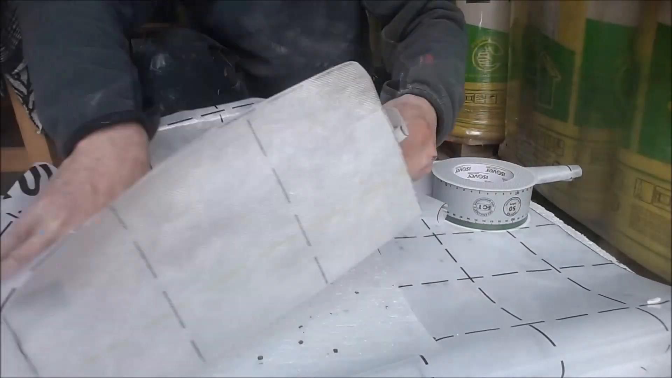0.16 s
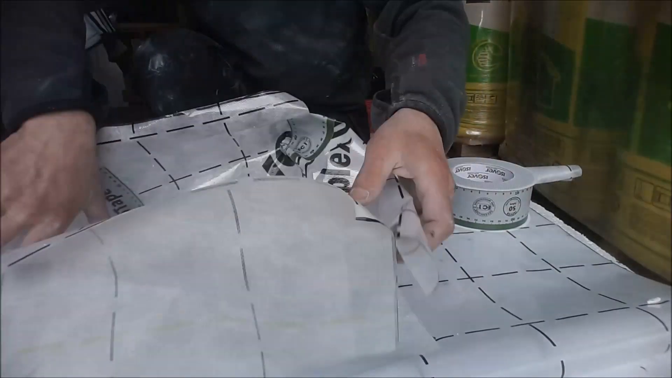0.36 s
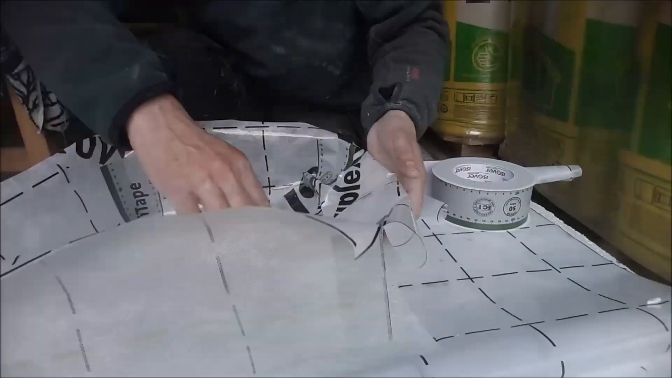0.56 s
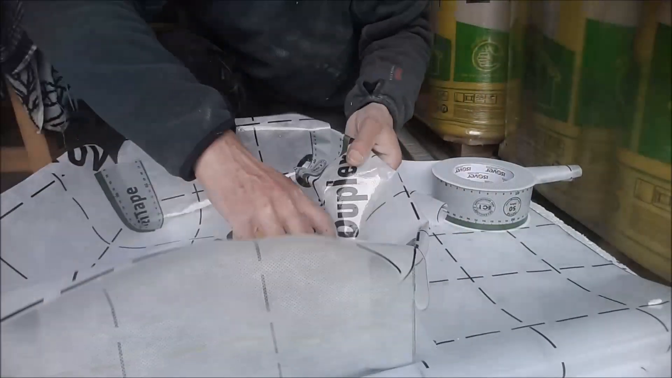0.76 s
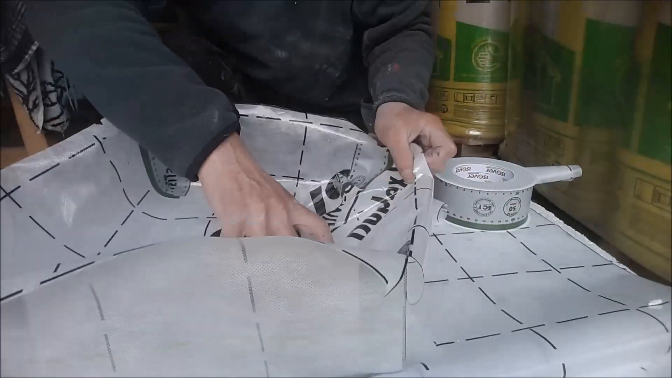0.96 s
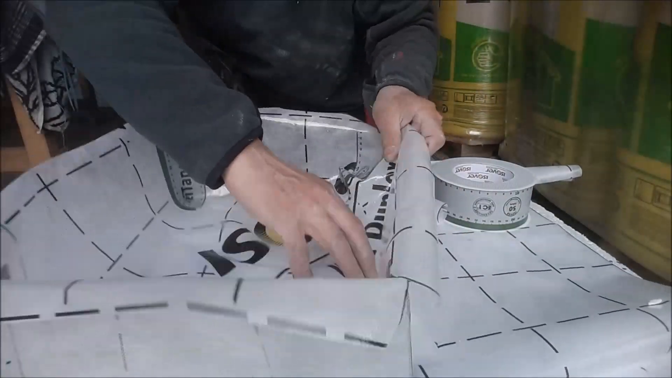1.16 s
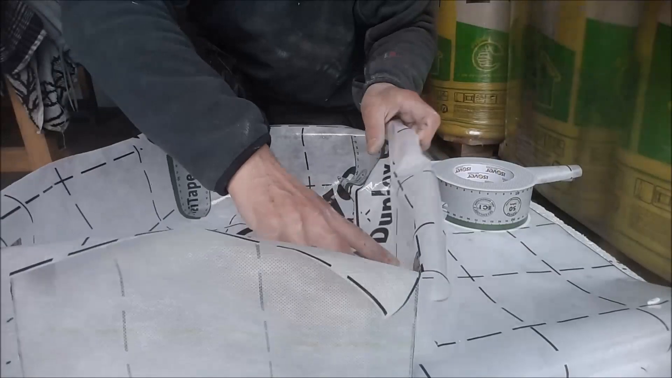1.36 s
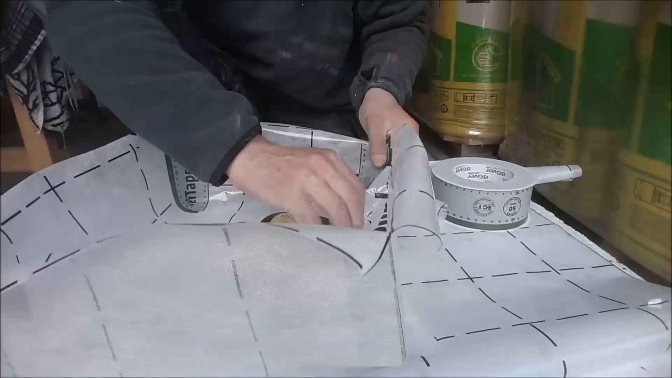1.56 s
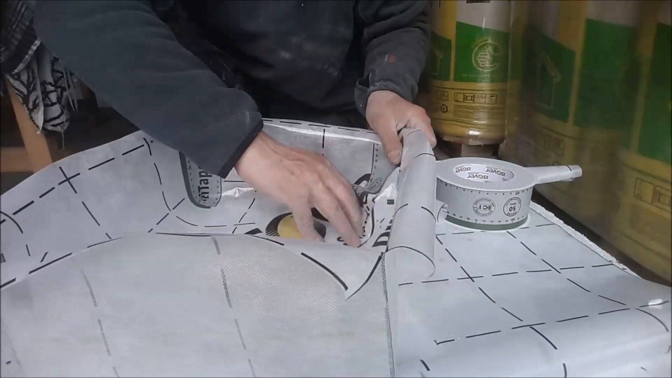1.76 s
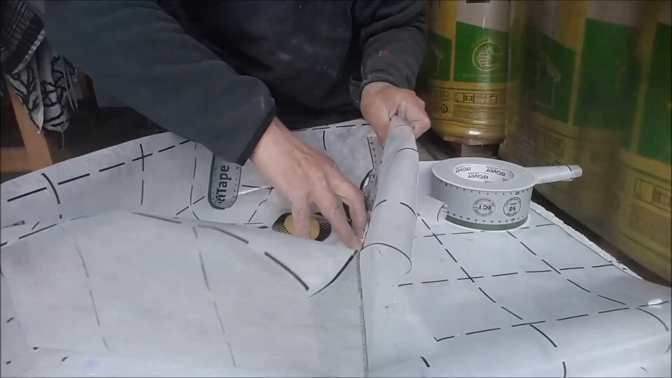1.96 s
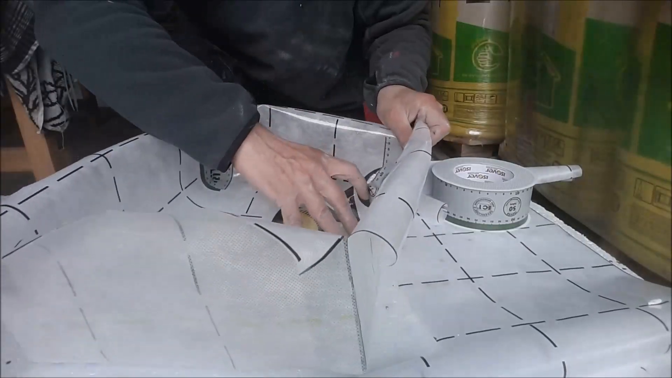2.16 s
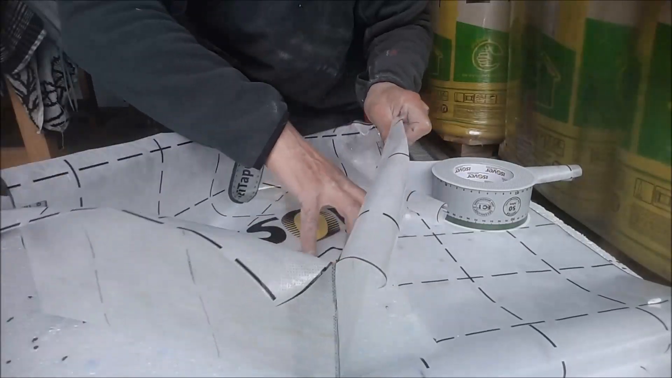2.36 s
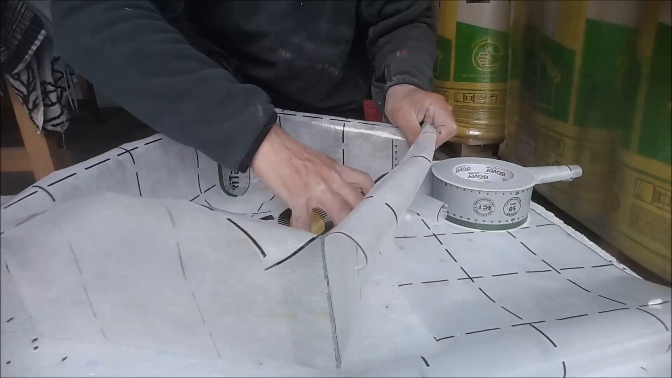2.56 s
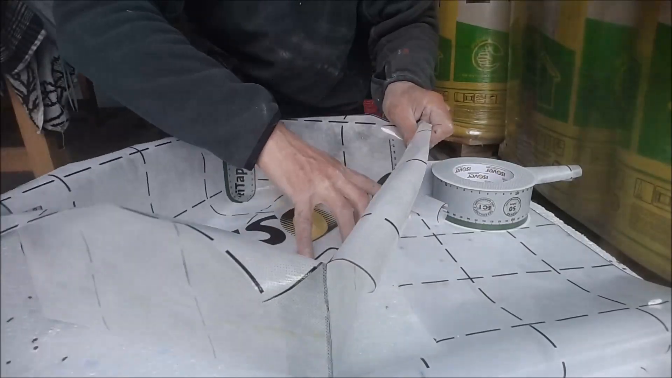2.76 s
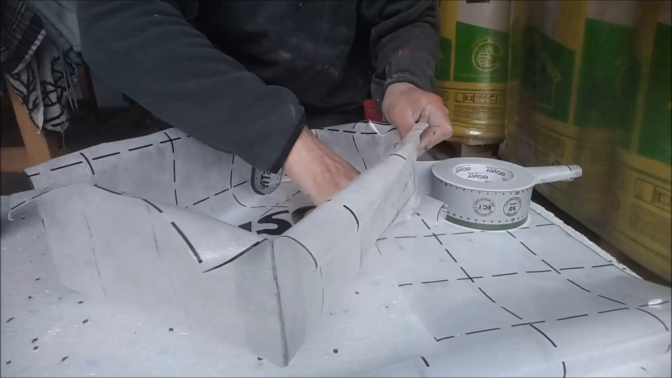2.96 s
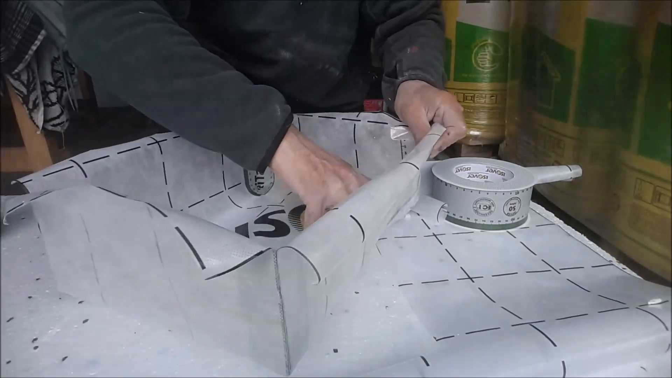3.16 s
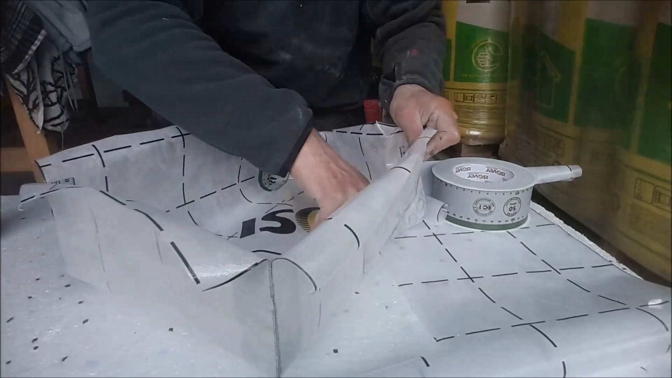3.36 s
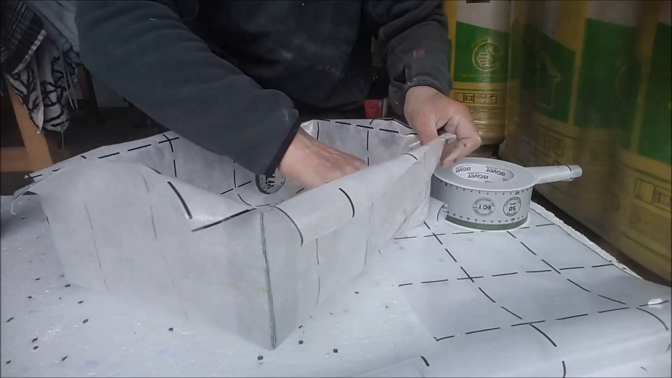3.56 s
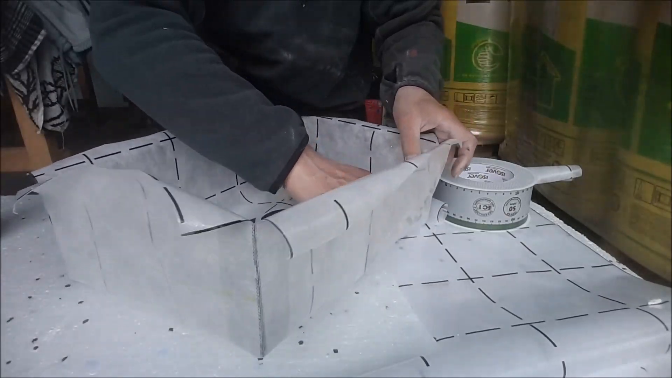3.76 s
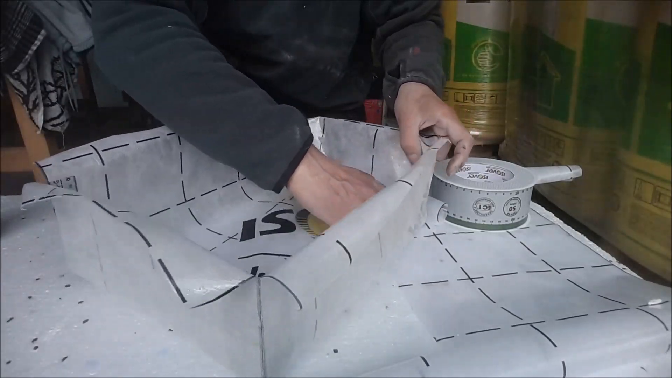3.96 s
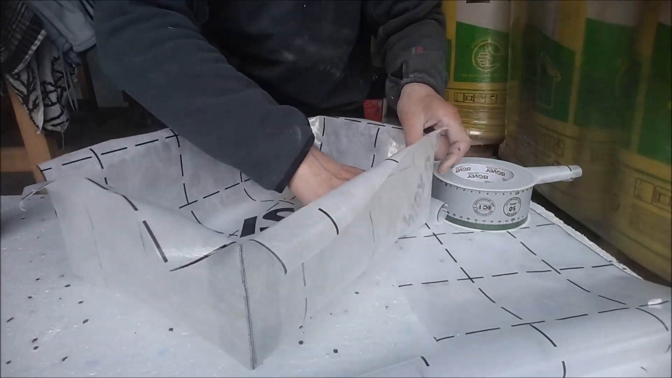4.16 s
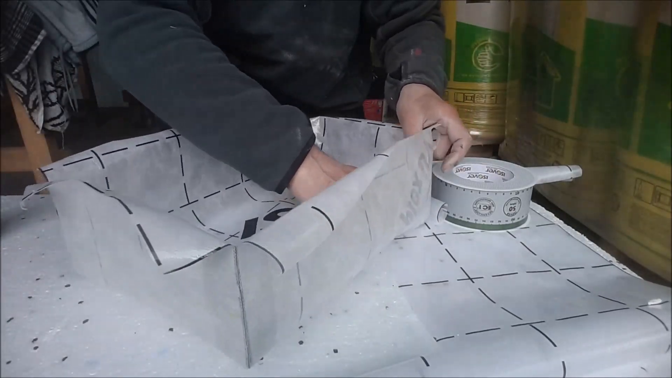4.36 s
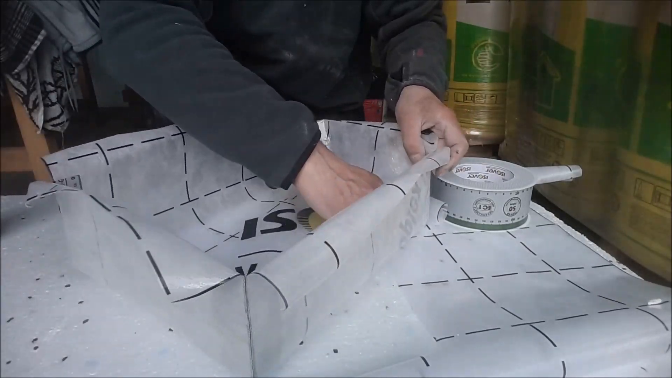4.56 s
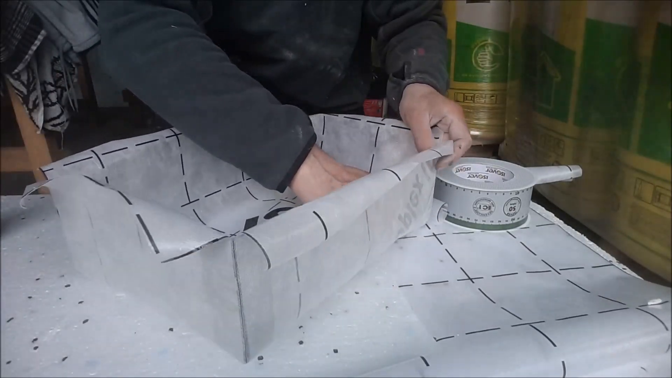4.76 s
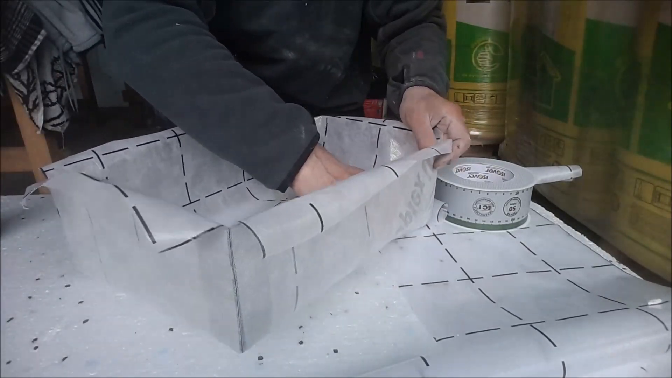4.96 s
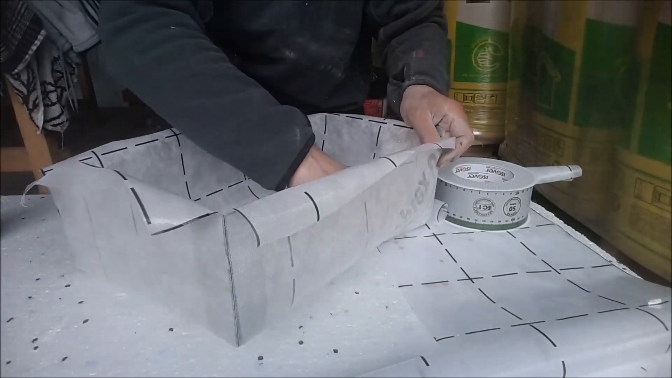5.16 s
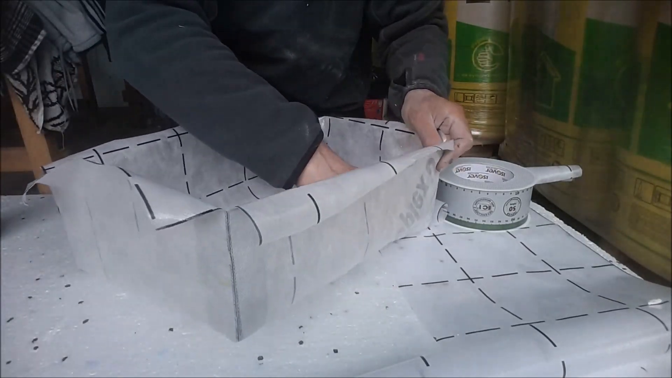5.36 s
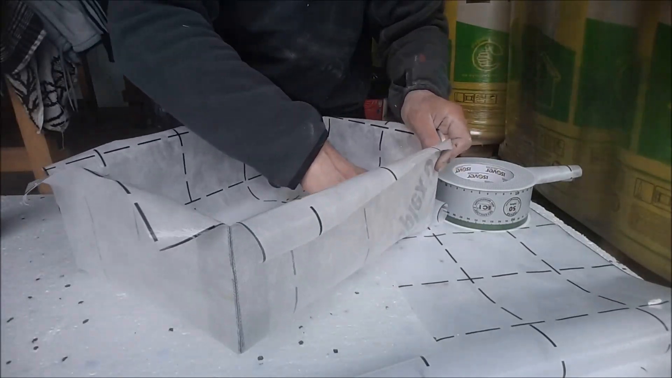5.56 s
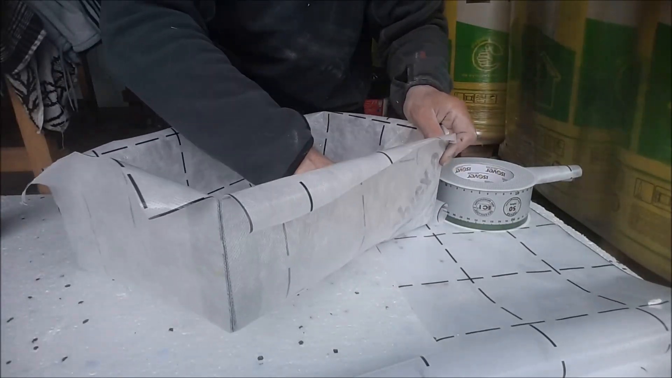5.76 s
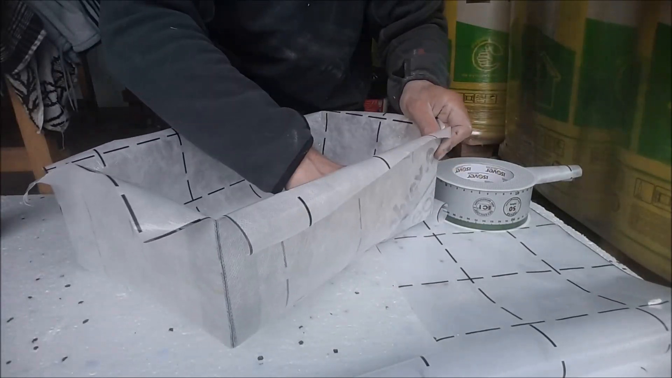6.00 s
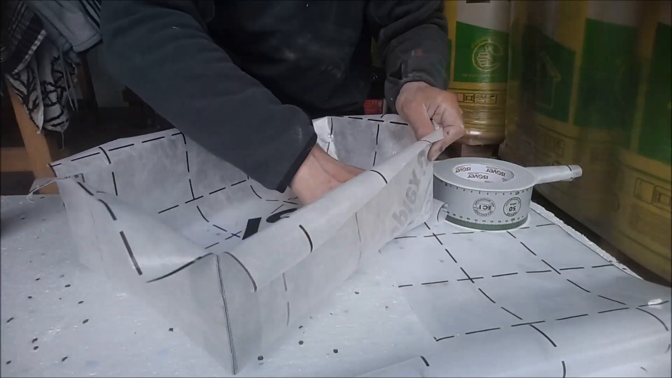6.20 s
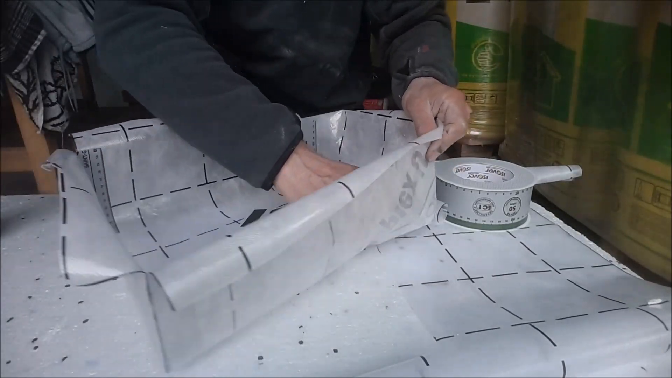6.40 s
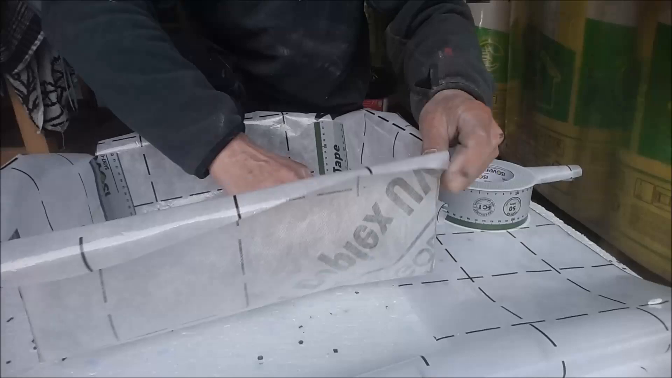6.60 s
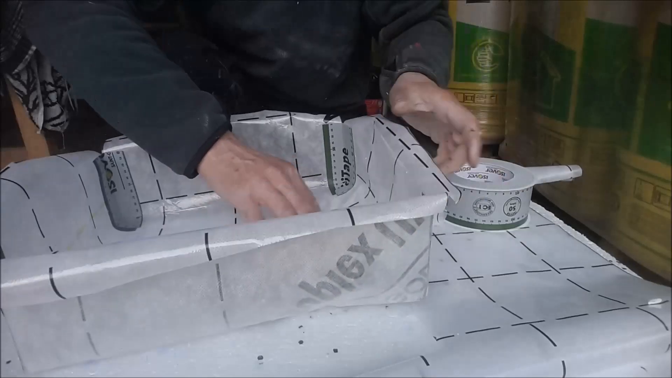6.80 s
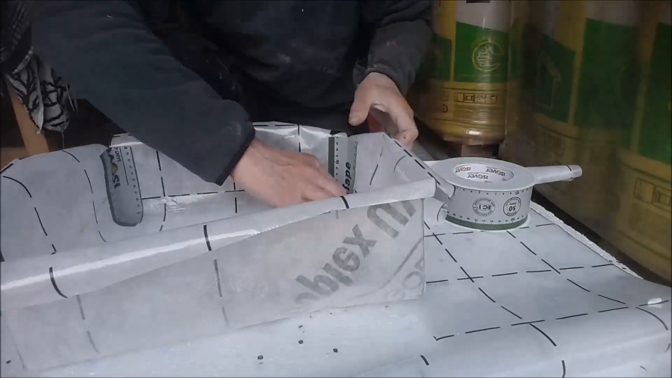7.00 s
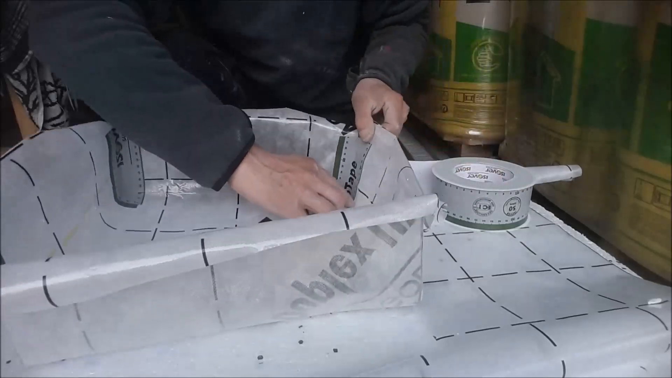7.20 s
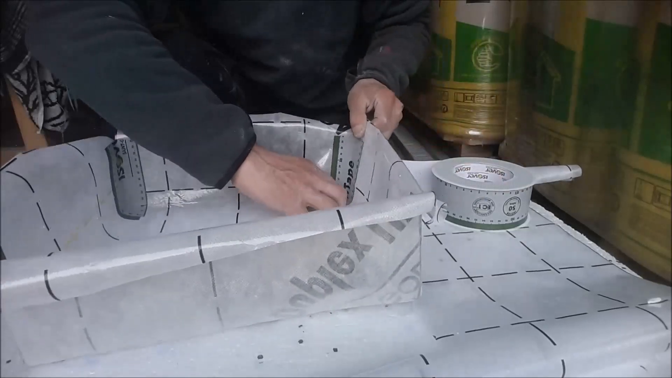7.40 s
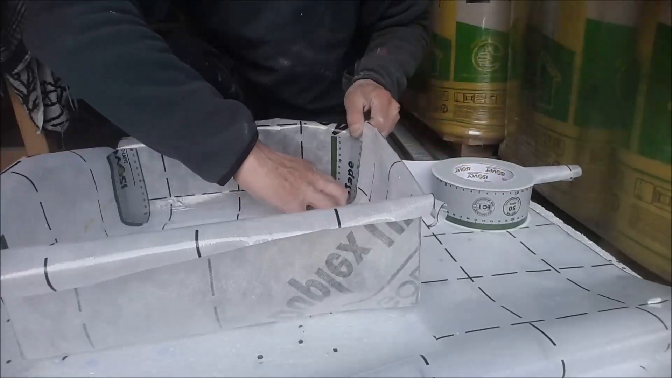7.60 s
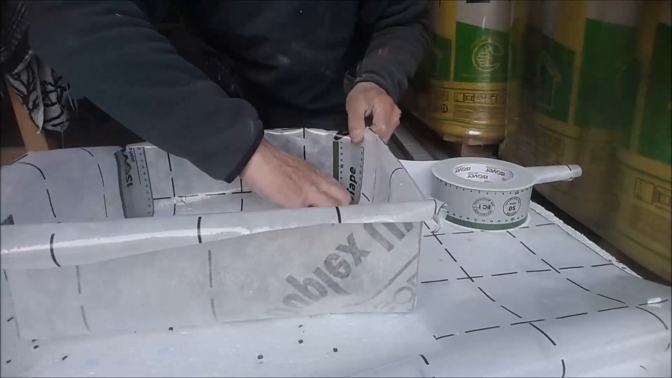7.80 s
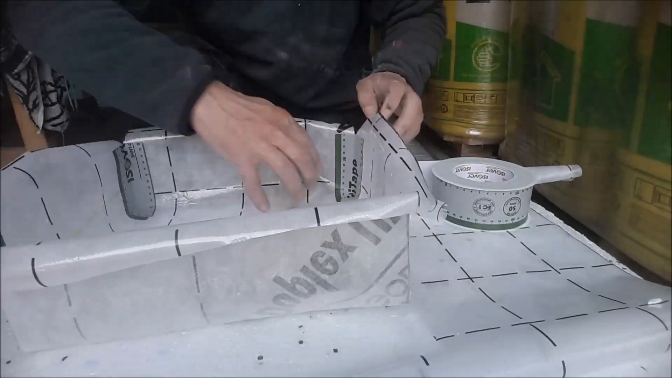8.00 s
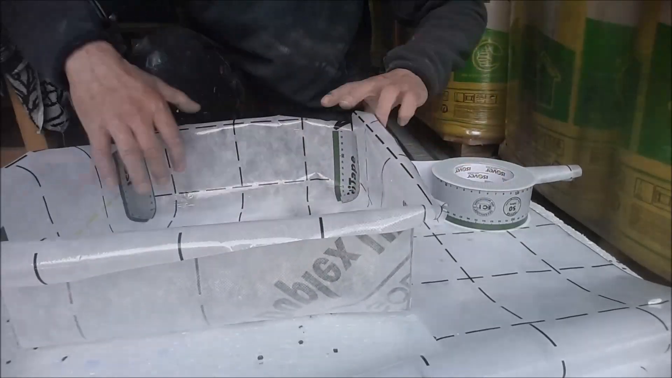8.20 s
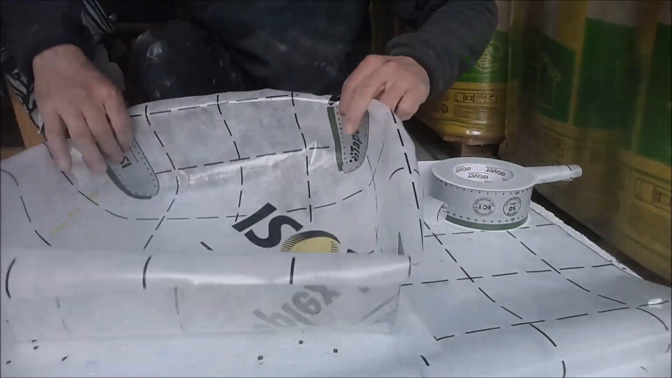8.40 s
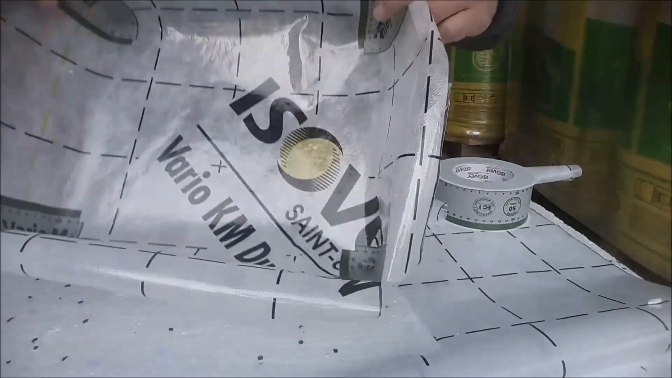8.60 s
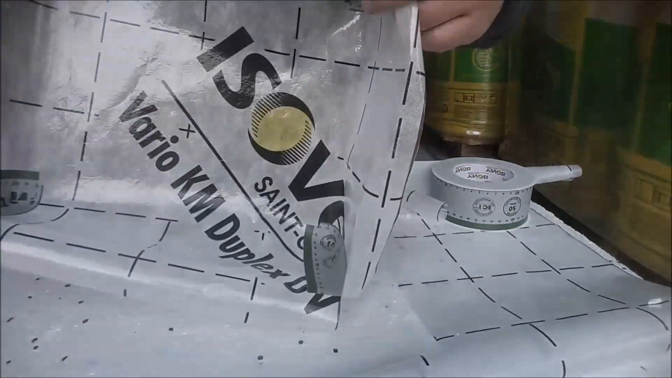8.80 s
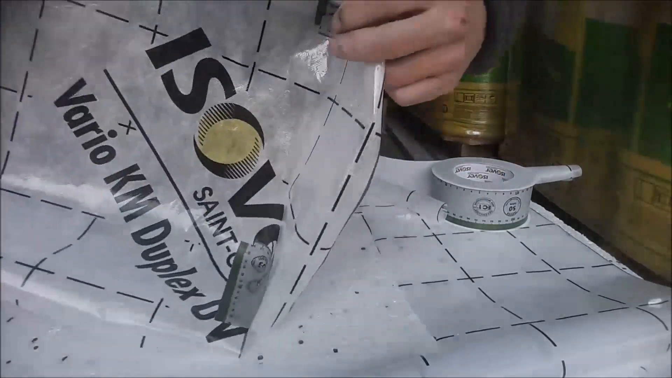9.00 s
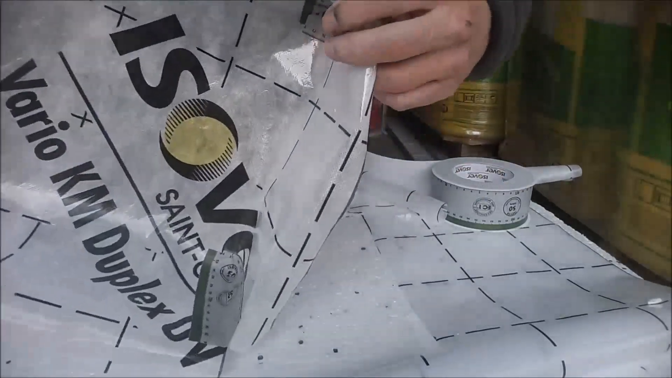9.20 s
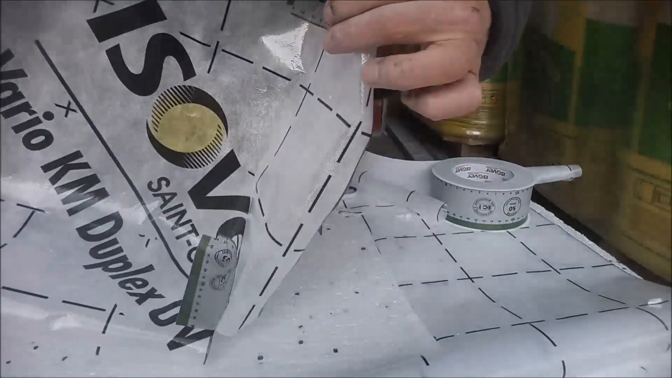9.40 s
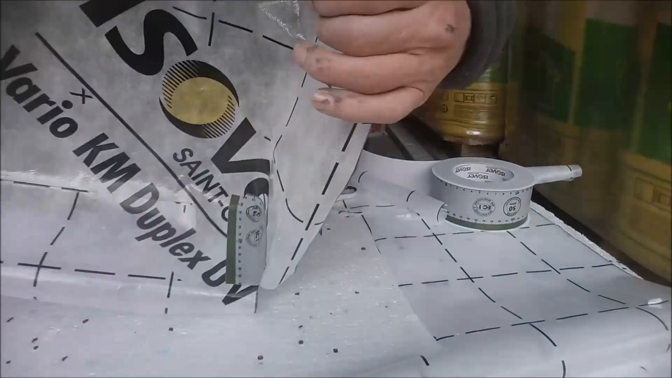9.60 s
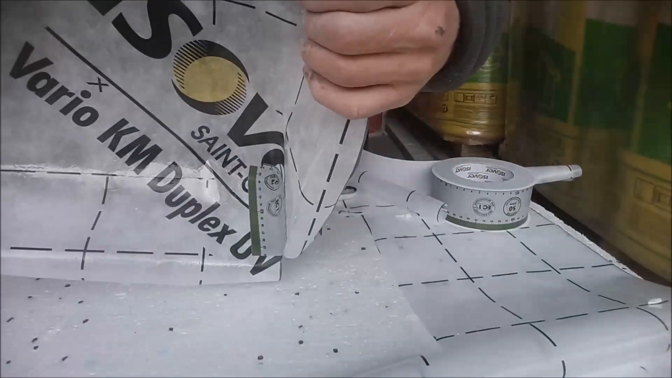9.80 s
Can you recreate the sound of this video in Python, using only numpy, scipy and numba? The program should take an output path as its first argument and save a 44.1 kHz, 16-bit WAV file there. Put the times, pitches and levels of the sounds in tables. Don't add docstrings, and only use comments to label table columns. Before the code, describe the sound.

Hands turn and crease a stiff plastic sheet on a workbench, loud crackling snaps and rustling that gradually thin to faint crinkles.

```python
import sys
import numpy as np
from scipy import signal
from scipy.fft import rfft, irfft, next_fast_len
from scipy.io import wavfile
from scipy.ndimage import uniform_filter1d
from numba import njit

SR = 44100
rng = np.random.default_rng(int(sys.argv[2]) if len(sys.argv) > 2 else 0)


def rack_gain(trim_db):
    fader = np.asarray(trim_db, float)
    return 10 ** (fader / 20)


def to_wav(s):
    ch = np.atleast_2d(s).T
    pcm = np.round(np.clip(ch, -1, 1) * 32767)
    wavfile.write(sys.argv[1], SR, pcm.astype(np.int16))


N = 434370
SECONDS = np.arange(N) / SR
LONG = next_fast_len(N, True)
BINS_HZ = np.fft.rfftfreq(LONG, 1 / SR)

# (frequency [Hz], level [dB per Hz])
SHEET_COLOUR = [(60, 7), (120, -13), (240, -4.5), (450, -0.5), (900, -3.5), (1800, -2.5), (3500, -8.5),
                (5000, -11.5), (6000, -17), (7200, -30.5), (9000, -32.5), (13000, -31), (16000, -34)]
PANEL_HZ, CREASE_HZ, FACET_HZ = 350, 2200, 9000
PORTS_DIFFER_HZ = 1670
SLIDE_PER_TIGHT = 0.22


def colour_db(rows, hz):
    table_hz, table_db = np.transpose(rows)
    return np.interp(np.log(np.maximum(hz, 1)), np.log(table_hz), table_db)


def ports(size, rows=()):
    share = np.clip(np.fft.rfftfreq(size, 1 / SR) / PORTS_DIFFER_HZ, .4, 1)
    mid, side = rfft(rng.standard_normal((2, *rows, size)))
    pair = np.array([mid + share * side, mid - share * side])
    return irfft(pair / np.sqrt(1 + share ** 2), size)


def tint(db):
    noise = irfft(rfft(ports(LONG)) * rack_gain(db), LONG)[:, :N]
    return noise / np.sqrt(np.mean(noise ** 2))


def walk(rate_hz):
    hold = int(SR / rate_hz)
    steps = np.repeat(rng.standard_normal(N // hold + 1), hold)
    return uniform_filter1d(steps, hold)[:N]


def hands(t):
    # (peak time [s], effort [dB],
    # rise [s], fall [s], tightness of small facets [dB])
    hand_pushes = [(0.0, -26, 0.498, 0.061, -14), (0.183, -28, 0.18, 0.21, -11.5),
                   (0.488, -33.5, 0.24, 0.082, -16), (0.768, -37.5, 0.018, 0.5, -16.5),
                   (0.864, -35.5, 0.11, 0.079, -13), (1.015, -21, 0.093, 0.15, -18),
                   (1.309, -26, 0.11, 0.12, -15.5), (1.403, -30.5, 0.048, 0.054, -21.5),
                   (1.445, -35, 0.058, 0.16, -17.5), (0.58, -42.5, 0.027, 0.075, -16.5),
                   (1.594, -49.5, 0.032, 0.27, -19), (1.712, -50.5, 0.41, 0.58, -13),
                   (1.833, -29.5, 0.022, 0.05, -20), (1.946, -24, 0.085, 0.11, -18),
                   (2.183, -42, 0.29, 0.15, -18.5),
                   (2.313, -38.5, 0.0099, 0.91, -17.5), (2.5, -30.5, 0.12, 0.11, -19.5),
                   (2.603, -31, 0.054, 0.11, -25), (2.74, -42.5, 0.23, 0.023, -18),
                   (3.455, -42.5, 0.04, 0.043, -5), (2.908, -38, 0.12, 0.045, -18),
                   (3.001, -33.5, 0.19, 0.093, -15.5), (3.157, -37.5, 0.065, 0.075, -18.5),
                   (3.236, -47, 0.066, 0.28, -15.5), (3.401, -32, 0.093, 0.088, -18.5),
                   (3.585, -42.5, 0.084, 0.26, -15.5), (3.876, -31, 0.023, 0.099, -19),
                   (4.082, -42.5, 0.36, 0.13, -25), (4.176, -48, 0.083, 0.15, -14),
                   (4.303, -43, 0.12, 0.14, -22.5),
                   (4.494, -43.5, 0.043, 0.11, -16.5), (4.612, -38, 0.04, 0.085, -19),
                    (4.799, -49.5, 0.086, 0.26, -15.5), (4.899, -44, 0.1, 0.037, -22),
                    (5.114, -37.5, 0.06, 0.076, -23.5), (5.327, -42.5, 0.054, 0.13, -29),
                    (5.417, -55, 0.059, 0.14, -9), (5.525, -56, 0.12, 0.22, -21),
                    (5.674, -55, 0.11, 0.11, -18), (5.764, -39.5, 0.012, 0.16, -18),
                    (5.994, -45, 0.051, 0.069, -23.5), (6.08, -53.5, 0.025, 0.27, -12),
                    (6.2, -58, 0.03, 0.043, -32), (6.345, -48, 0.14, 0.11, -25),
                    (6.93, -65, 0.08, 0.21, -14.5), (6.445, -32.5, 0.049, 0.13, -19),
                    (6.49, -31, 0.082, 0.091, -6.5), (6.639, -36.5, 0.075, 0.18, -15),
                    (6.805, -40, 0.078, 0.1, -17.5),
                   (7.107, -36, 0.055, 0.19, -19), (7.261, -33, 0.028, 0.13, -25),
                   (7.364, -43.5, 0.044, 0.093, -19), (7.577, -40.5, 0.15, 0.15, -22),
                   (7.873, -41, 0.29, 0.17, -21), (8.016, -45.5, 0.24, 0.12, -11.5),
                   (8.089, -43, 0.089, 0.14, -24), (8.36, -48.5, 0.038, 0.057, -27),
                   (8.655, -48, 0.041, 0.092, -19), (8.406, -41, 0.0099, 0.16, -16),
                   (8.484, -37, 0.11, 0.07, -11.5), (8.559, -39, 0.11, 0.053, -17),
                   (8.14, -53, 0.06, 0.12, -30), (8.729, -46, 0.49, 0.18, -17),
                   (9.013, -47.5, 0.12, 0.26, -16), (9.275, -57.5, 1, 0.1, -16),
                   (9.379, -50, 0.16, 0.24, -18), (9.643, -59, 0.12, 0.41, -18.5)]
    pushes = np.array(hand_pushes)
    peak_s, db, rise_s, fall_s, tight_db = pushes.T[..., None]
    rest_db = -84
    grid_s = np.arange(0, N / SR + .002, .002)
    late_s = grid_s - peak_s
    power = rack_gain(2 * (db - 20 * np.maximum(-late_s / rise_s, late_s / fall_s)))
    effort_db = 1.5 + 10 * np.log10(power.sum(axis=0) + rack_gain(2 * rest_db))
    facet_db = 4.5 + (power * tight_db).sum(axis=0) / power.sum(axis=0)
    panel_db = -0.5 - 0.11 * (effort_db + 50.0)
    return [np.interp(t, grid_s, curve) for curve in (effort_db, panel_db, facet_db)]


@njit
def ring(start, pole, rise, gain, length, lag):
    out = np.zeros((2, N + 16384))
    for j in range(len(start)):
        swing, unrisen = 1. + 0j, 1.
        for i in range(length[j]):
            wave = swing * (1 - unrisen)
            out[0, start[j] + i] += (gain[0, j] * wave).imag
            out[1, start[j] + lag + i] += (gain[1, j] * wave).imag
            swing *= pole[j]
            unrisen *= rise[j]
    return out[:, :N]


def buckle(s, db, pitch_hz, panel_db, facet_db, pan_db, count, cycles, spread_s, scatter_db, focus_db,
           as_energy=False):
    u = rng.random((len(s), count, 3))
    g = rng.standard_normal((len(s), count, 3))
    hz = 110 * (15800 / 110) ** ((np.arange(count) + u[..., 0]) / count)
    low = np.clip(np.log(CREASE_HZ / hz) / np.log(CREASE_HZ / PANEL_HZ), 0, 1) ** 1.67
    high = np.clip(np.log(hz / CREASE_HZ) / np.log(FACET_HZ / CREASE_HZ), 0, 1) ** 1.6

    fold_db = low * (panel_db - np.median(panel_db))[:, None]
    fold_db = fold_db + high * (facet_db - np.median(facet_db))[:, None]
    octaves_off = np.minimum(np.abs(np.log2(hz / pitch_hz[:, None])), 1.4)
    usual_off = np.minimum(np.abs(np.log2(CREASE_HZ / pitch_hz[:, None])), 1.4)
    fold_db = fold_db - focus_db * (octaves_off - as_energy * usual_off) * (1 - low) * (1 - high)

    loose = as_energy * 0.088 * low * np.clip(panel_db, 0, 12)[:, None]
    tau = cycles / hz * (hz / CREASE_HZ) ** 0.48 * (1.5 + loose)
    size_db = db[:, None] + fold_db + colour_db(SHEET_COLOUR, hz) + scatter_db * g[..., 0]
    size = rack_gain(size_db) * np.sqrt(hz / CREASE_HZ * 0.0018 / tau)
    if as_energy:
        energy = np.sum(size ** 2 * tau / 6, axis=1, keepdims=True) * 1000
        size = size * rack_gain(db[:, None]) / np.sqrt(energy)

    differ = np.clip(hz / PORTS_DIFFER_HZ, .45, 2)
    astray = np.minimum(hz / 4000, 1)
    inward = np.sign(g[:, :1, 0])
    phase = np.pi / 2 * inward + 2 * np.pi * (u[..., 1] - .5) * (astray + 0.58 * low)
    port_phase = 0.54 * differ * g[..., 1] * np.array([1, -1])[:, None, None]
    lean = rack_gain(pan_db[:, None] / 2 + 1.63 * differ * g[..., 2])
    gain = size * np.exp(1j * (phase + port_phase)) * np.array([lean, 1 / lean])

    start_s = s[:, None] + spread_s * astray * u[..., 2] ** 2.2
    start = np.clip(start_s * SR, 0, N - 1).astype(np.int64)
    pole = np.exp((2j * np.pi * hz - 1 / tau) / SR)
    rise = np.exp(-1 / (0.12 * tau * SR))
    length = np.minimum(6 * tau * SR + 2, 16000).astype(np.int64)
    lag = 4
    return ring(start.ravel(), pole.ravel(), rise.ravel(), gain.reshape(2, -1), length.ravel(), lag)


def snaps():
    # (time [s], energy [dB per ms], pitch of the crease [Hz], large panels [dB],
    # small facets [dB])
    crease_snaps = [(0.0109, -22, 700, -9.5, 0), (0.0256, -22, 990, -1.5, -2), (0.0345, -14.5, 845, -4, 4),
                    (0.0603, -22.5, 960, 2, -1), (0.0907, -10.5, 1440, -25, -12),
                    (0.1005, -16.5, 2800, -3, -5), (0.134, -13.5, 1100, -5, 1), (0.1961, -11, 2240, -7, 4),
                    (0.2803, -22.5, 1490, -13, -14), (0.4676, -26, 3600, -8, 0), (0.5005, -20.5, 1670, -4, 2),
                    (0.553, -25.5, 700, 10, -18), (0.5739, -28.5, 656, 1, 7), (0.7438, -25.5, 1590, -12, -2),
                    (0.7615, -23, 3600, -23, -4), (0.7798, -39, 3880, -11, -4), (0.7921, -16, 920, 0, 5),
                    (0.8066, -22, 1400, -5, 2), (0.866, -14.5, 4800, -12, 1), (0.876, -29, 1400, 0, -2),
                    (0.9406, -28, 2800, -11, -6), (0.9965, -15, 1400, -10, -1), (1.003, -14.5, 4500, -17, 9),
                    (1.0082, -14.5, 1500, -5, 13), (1.0161, -27, 2000, -4, -9), (1.0274, -19, 1200, 6, -4),
                    (1.0472, -17, 490, 3, 7), (1.0655, -12, 5200, 2, 8), (1.0975, -16.5, 4500, -29, 1),
                    (1.166, -21, 2700, -29, 4.5), (1.2098, -21.5, 2400, -18, 0), (1.2345, -21, 4900, -11, 7),
                    (1.2637, -33, 4400, 20, 3), (1.2771, -17, 3200, 2, -3), (1.3156, -16, 5240, 8, 13),
                    (1.3279, -12.5, 3400, -8, 4), (1.5819, -30.5, 2500, -4, 1), (1.5957, -26, 1600, 2, 9),
                    (1.7054, -26, 1110, 1, -11), (1.72, -25.5, 660, 14, -12),
                    (1.8235, -18.5, 1800, -6, 4), (1.8309, -18, 900, 8, -1), (1.8429, -24.5, 5300, 9, 13),
                   (1.879, -20.5, 5300, 0, 14), (1.9128, -10, 3200, 0, 12), (1.93, -21, 2700, -4, -3),
                   (1.9442, -14.5, 610, 6, 1), (1.951, -22, 1600, 2, -2), (1.965, -14.5, 2100, 4, 0),
                   (1.973, -11.5, 1670, -2, 8), (1.9988, -17.5, 5300, 8.5, 11), (2.111, -24.5, 490, 7, -4),
                   (2.1653, -19, 1700, -1, 4.5), (2.1795, -24, 1100, -1, -3), (2.215, -22.5, 2370, -14, -1),
                   (2.299, -30, 800, 8, -5), (2.3046, -20.5, 720, 2, -1), (2.315, -19, 1390, -7, -20),
                   (2.319, -20.5, 1400, -5, -14), (2.3225, -18, 1400, -11, -17), (2.3445, -18, 870, 2, 2),
                   (2.3592, -33, 3900, 0, 9), (2.418, -17.5, 700, 2, 10), (2.4624, -14.5, 420, 2, 8),
                   (2.4906, -22.5, 5300, 9, 28), (2.5004, -20.5, 3500, -19, 6), (2.528, -19.5, 1600, -2, 9),
                   (2.5863, -31, 1600, -3, 2), (2.6007, -27.5, 3400, -1, -5), (2.6332, -23, 4400, 1, 4),
                   (2.6457, -23, 1110, -8, -6.5), (2.7619, -28.5, 510, 12, -16),
                   (2.8598, -22.5, 4650, 1, 19), (2.8662, -22.5, 1000, 4, 7), (2.9643, -27, 1890, -9, 8),
                   (2.976, -21.5, 1000, 2, 14), (2.9962, -22, 5300, 2, 10), (3.0233, -15.5, 4500, -5, 10),
                   (3.117, -25, 3600, 5, -14), (3.1582, -28, 450, 35, 1),
                    (3.2337, -17.5, 1620, -16, 7), (3.3525, -18.5, 840, -9, -28), (3.38, -18.5, 4900, -3, 16),
                  (3.4056, -30, 4000, 5, 8), (3.421, -24, 2800, -5, 7), (3.4304, -28, 1100, -1, -5),
                  (3.4432, -30, 5300, -2, 26), (3.4603, -26, 1300, 9, 18), (3.563, -30, 3400, -9, -8),
                  (3.594, -22, 710, -5, -15), (3.6056, -20, 1300, -2, -11), (3.7285, -37, 2290, -3, -1),
                  (3.863, -22.5, 3000, -17, -2), (3.8887, -17.5, 5300, -11, 15),
                  (3.91, -21.5, 4500, 3.5, 5), (3.962, -30, 600, 24, -4), (4.0027, -23.5, 1670, -3, 4),
                  (4.016, -27, 780, 3, -6), (4.0597, -24.5, 2170, -12, 0), (4.094, -27, 1500, -8, -5),
                  (4.0996, -22, 910, 9, 0), (4.1557, -33, 930, 5, 13), (4.175, -20, 4000, -1.5, 4),
                  (4.2944, -32, 2200, 1, -6), (4.314, -23.5, 830, -6, 11), (4.3526, -32.5, 450, 15, -3),
                  (4.4921, -28, 2100, -8, -6), (4.5434, -32, 710, 10, -10), (4.5933, -21.5, 2660, -6, 2),
                  (4.6262, -23.5, 2000, -2, 13), (4.634, -28.5, 1100, 3, 1), (4.7922, -31, 770, 12, -14),
                  (4.934, -24.5, 450, 7, 12), (4.9438, -36, 4200, -8, 2), (5.088, -22.5, 2440, -10, 4),
                  (5.1207, -24, 490, 16, -12),
                    (5.3224, -29, 2470, -6, -1), (5.3571, -26, 450, 6, 13), (5.4037, -32.0, 580, 3, -17),
                   (5.4233, -21, 1080, -7, -21), (5.5176, -27.5, 526, -1, -41),
                   (5.6271, -38.5, 450, 11, -4), (5.666, -30.5, 590, -3, -32), (5.684, -33.5, 760, 17, 6),
                   (5.7498, -24.5, 800, -6, -17), (5.7662, -25.5, 2760, -1, 0),
                   (5.7831, -23.5, 960, 0, -22), (5.8116, -24.5, 1490, 2, 11), (5.859, -38, 450, 16, -7),
                   (5.9828, -33.5, 1400, 0, -6), (5.998, -31, 1000, -5, 10), (6.0234, -39, 2000, -6, -1),
                   (6.074, -23, 2380, -9, 9), (6.085, -37, 4600, -15, 15), (6.1677, -36.5, 5600, 5, 20),
                   (6.2585, -35, 4800, -3, 12), (6.2823, -29.5, 450, 3.5, 4), (6.322, -32.5, 450, 16, 1),
                   (6.351, -35, 2100, -14.5, -5), (6.3647, -26, 510, 11, 8), (6.372, -26, 1200, -29, -15),
                   (6.405, -31, 1100, -6, -6), (6.4254, -25, 750, -10, -7), (6.4345, -30, 2400, 2.5, -6),
                   (6.5788, -18, 600, -13, -1), (6.798, -16.5, 1770, -3, 2), (6.8176, -22, 514, -11, 11),
                   (6.8281, -32, 5300, -3, 26), (6.8763, -31, 490, 25, 2), (7.0673, -18.5, 3650, 2, -2),
                   (7.0784, -21.5, 660, -11, -9), (7.0966, -33, 2000, -7, 0), (7.112, -20.5, 840, -6, -2),
                    (7.126, -17, 990, 1, -3), (7.1492, -23.5, 960, -1, 9), (7.163, -19.5, 1000, -4, 7),
                  (7.2412, -17, 980, -15, -2), (7.2504, -21, 2400, -15, -5), (7.2733, -20, 650, 12, -1),
                  (7.2985, -16, 460, 3.5, 6), (7.3613, -15.5, 1520, -16, -1), (7.3727, -26.5, 3600, 6, 13),
                  (7.3918, -38, 540, 19, 1), (7.545, -25, 710, 19, 0), (7.5626, -20.5, 840, 19, -12),
                  (7.5787, -22, 590, -17, -11), (7.591, -24.5, 3980, -15, -4), (7.6524, -34, 5300, -11, 13),
                  (7.7259, -31.5, 1310, 2, -3), (7.759, -26, 2720, -6, 14), (7.7821, -25.5, 4900, 3, 12),
                  (7.79, -25.5, 840, 3, 4), (7.833, -16, 450, -2, -1), (7.8482, -30, 660, 8, -6),
                  (7.8745, -13.5, 1740, -9, 1), (7.9007, -22.5, 2000, -11, 6), (8.0104, -29, 1000, -7, -1),
                  (8.0841, -13.5, 600, -2, -35), (8.0931, -19.5, 400, 15, -1), (8.337, -34.5, 4500, 10, 11),
                  (8.358, -30.5, 420, 20, -9), (8.4228, -21, 420, 1, -11), (8.4891, -24, 600, 8, -5),
                  (8.5317, -20.5, 1970, -16, -28), (8.8909, -40.5, 1790, 0, -17),
                  (9.021, -32.5, 3800, -13, 4), (9.1022, -38.5, 2600, -11, 0), (9.265, -29.5, 490, 11, -15),
                  (9.2755, -23.5, 4900, -20, 18), (9.379, -20, 630, 0, -32), (9.4442, -32, 1610, 12, 11)]
    events = np.array(crease_snaps)
    s, db, pitch_hz, panel_db, facet_db = events.T
    return buckle(s + .0004, db - 1.0, pitch_hz, panel_db, facet_db, 0 * s, count=40, cycles=2.26,
                  spread_s=.0017, scatter_db=3.0, focus_db=6.5, as_energy=True)


def crackle():
    u = rng.random((4500, 4))
    when = u[:, 0] * N / SR
    effort_db, panel_db, facet_db = hands(when)
    burst_db = 2.2 * walk(60)[(when * SR).astype(int)]
    size_db = np.minimum(burst_db - 5.2 * np.log(u[:, 1]), 7)
    db = effort_db + size_db - SLIDE_PER_TIGHT * (facet_db + 10.0) - 0.5
    pitch_hz = 500 * 11 ** u[:, 3]
    pan_db = 6 * (u[:, 2] - .5)
    return buckle(when, db, pitch_hz, panel_db, facet_db, pan_db, count=14, cycles=1.82,
                  spread_s=.0008, scatter_db=3.5, focus_db=10.5)


def rub():
    effort_db, panel_db, facet_db = hands(SECONDS)
    slide_db = effort_db + SLIDE_PER_TIGHT * (facet_db + 13)
    shared_db = 1.8 * walk(30) + 2.0 * walk(170)
    # (lowest [Hz], highest [Hz], level [dB])
    parts = [(89.5, 680, panel_db - 12.5), (600, 6200, -9.0),
             (2400, 20000, 0.51 * facet_db - 1.5), (7430, 28000, facet_db + 2.0)]
    out = 0
    for low_hz, high_hz, part_db in parts:
        below = np.maximum(np.log2(low_hz / (BINS_HZ + 1)), 0)
        above = np.maximum(np.log2((BINS_HZ + 1) / high_hz), 0)
        noise = tint(colour_db(SHEET_COLOUR, BINS_HZ) - 15 * (below + above))
        grain_db = 2.0 * walk(45) + 2.18 * walk(200)
        out = out + noise * rack_gain(slide_db + part_db + shared_db + grain_db)
    return out


def place(sheet):
    # (time [s], left minus right [dB])
    hand_side = [
        (0, -1.5),
        (2, -1.5),
        (2.998, 0),
        (6.5, 0),
        (9.85, -2.5),
    ]
    lean_db = np.interp(SECONDS, *np.transpose(hand_side))
    return sheet * rack_gain(np.array([lean_db, -lean_db]) / 2)


def room(x, size=4096):
    t60_s, tail_db, wall_s, wall_db = 0.088, -11.5, 0.012, -21.5
    count = -(-N // size)
    t = np.arange(3 * size) / SR
    tail = ports(len(t), (count,)) * rack_gain(-60 * t / t60_s) * np.clip(t / .006, 0, 1)
    tail = signal.lfilter([.45], [1, -.55], tail)
    tail *= rack_gain(tail_db) / np.sqrt(np.sum(tail ** 2, axis=2, keepdims=True))
    tail[..., int(wall_s * SR)] += rack_gain(wall_db)
    blocks = np.pad(x.mean(axis=0), (0, count * size - N)).reshape(1, count, size)
    wet = signal.fftconvolve(blocks, tail, axes=2)
    wet = np.pad(wet, ((0, 0), (0, 0), (0, 1))).reshape(2, count, 4, size)
    out = np.zeros((2, count + 3, size))
    for k in range(4):
        out[:, k:k + count] += wet[:, :, k]
    return out.reshape(2, -1)[:, :N]


def shop():
    # (frequency [Hz], level [dB per Hz])
    building_colour = [(24, -9), (40, 5), (81, 6), (276, -0.5), (320, -5), (556, -4), (1440, -14),
                       (2500, -23), (7360, -33), (16000, -23.5)]
    return tint(colour_db(building_colour, BINS_HZ)) * rack_gain(-56.5 + 1.5 * walk(4.1))


def waft():
    # (time [s], level [dB])
    air_push = [
        (8.35, -61),
        (8.572, -36.5),
        (8.598, -50),
        (8.9, -65),
        (9.0, -79),
    ]
    s, db = np.transpose(air_push)
    air = tint(-11 * np.abs(np.log2(BINS_HZ / 85 + .01)))
    return air * rack_gain(np.interp(SECONDS, s, db, left=-120, right=-120))


def scene():
    radiates = signal.butter(2, 133, "high", fs=SR, output="sos")
    sheet = signal.sosfilt(radiates, snaps() + crackle()) + rub()
    return place(sheet) + room(sheet) + shop() + waft()


def roll_off(x):
    return signal.sosfilt(signal.butter(12, 16860, fs=SR, output="sos"), x)


def record(dry):
    bass_cut = signal.butter(2, 50, "high", fs=SR, output="sos")
    top_cut = signal.ellip(6, .2, 17, 15800, fs=SR, output="sos")
    cut = signal.sosfilt(bass_cut, dry)
    rounded = np.tanh(1.2 * cut) / 1.2
    return roll_off(signal.sosfilt(top_cut, rounded))


dry = scene()
out = record(dry)
to_wav(out)
```